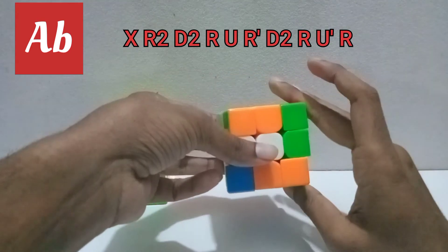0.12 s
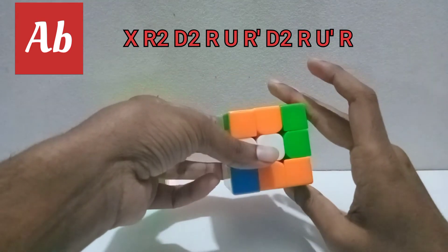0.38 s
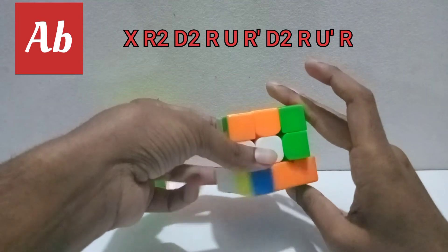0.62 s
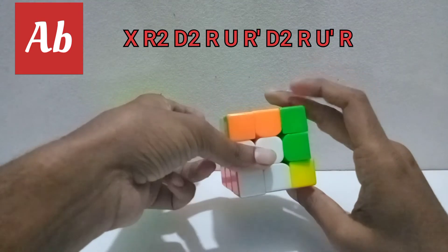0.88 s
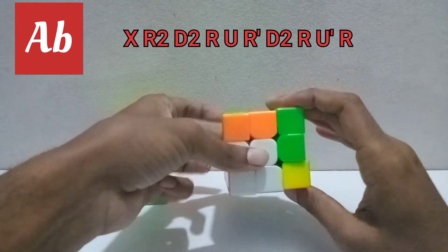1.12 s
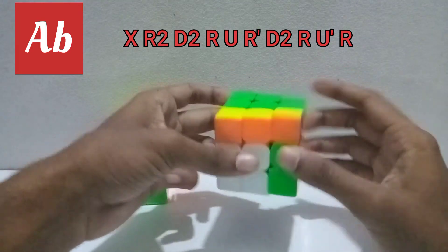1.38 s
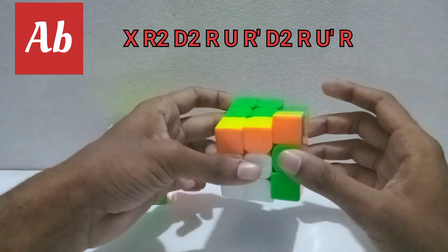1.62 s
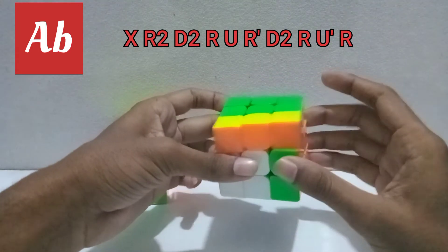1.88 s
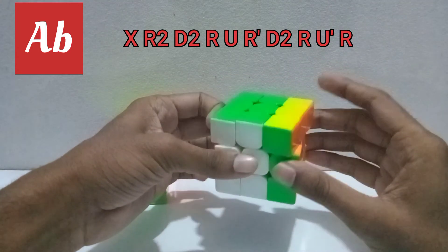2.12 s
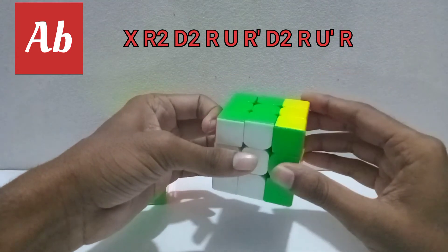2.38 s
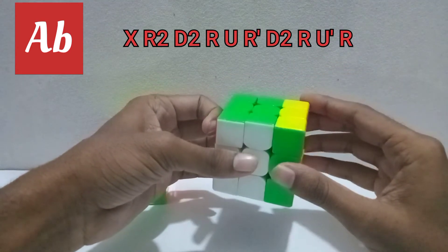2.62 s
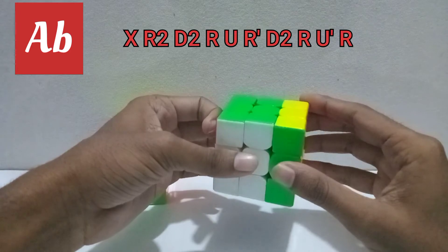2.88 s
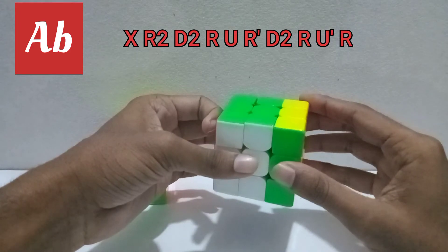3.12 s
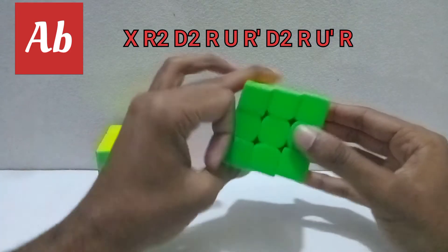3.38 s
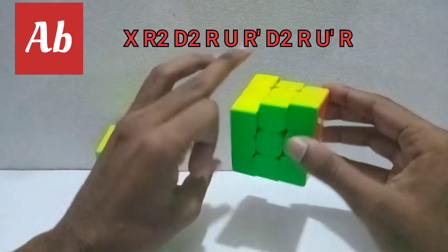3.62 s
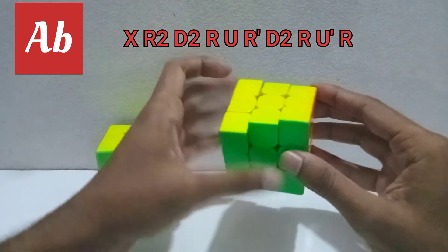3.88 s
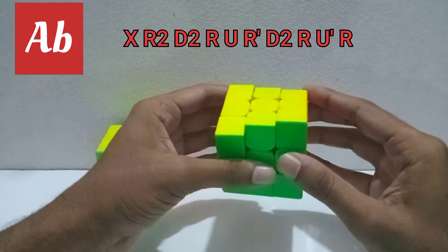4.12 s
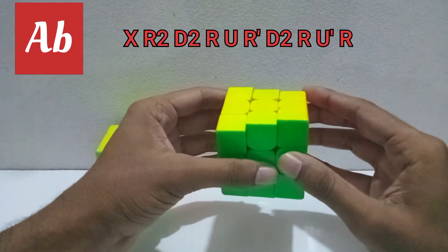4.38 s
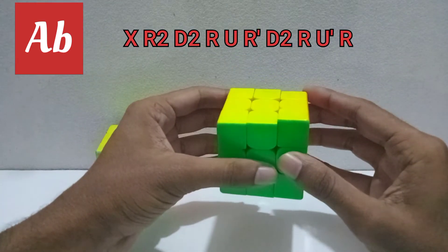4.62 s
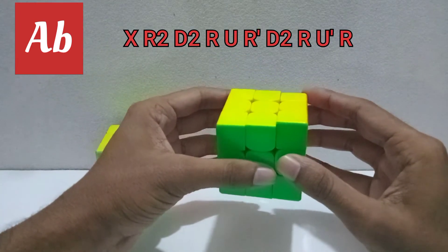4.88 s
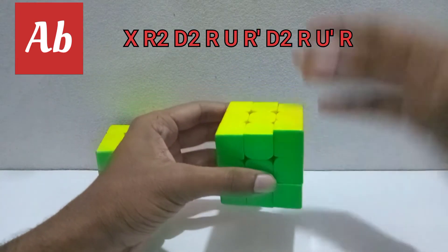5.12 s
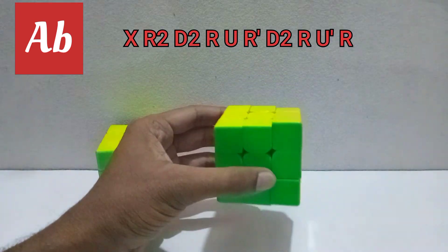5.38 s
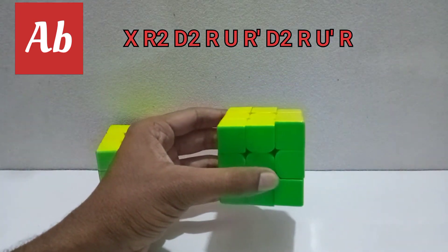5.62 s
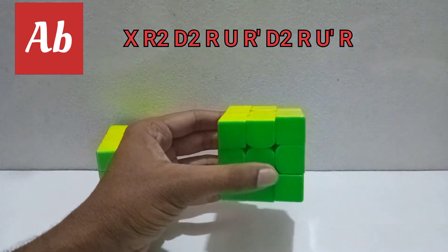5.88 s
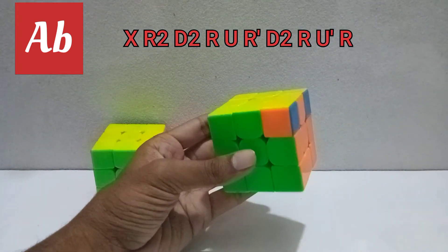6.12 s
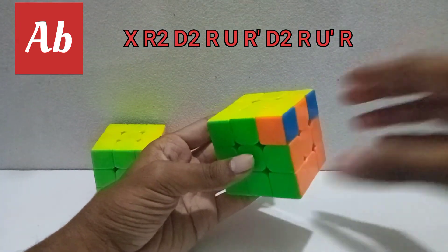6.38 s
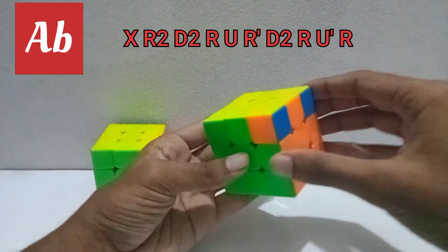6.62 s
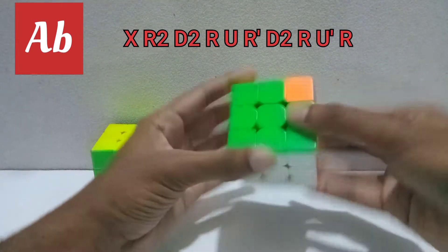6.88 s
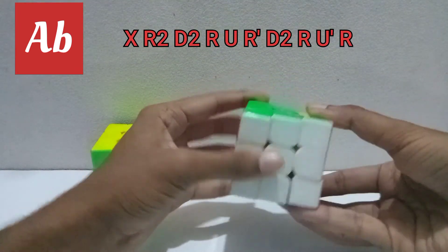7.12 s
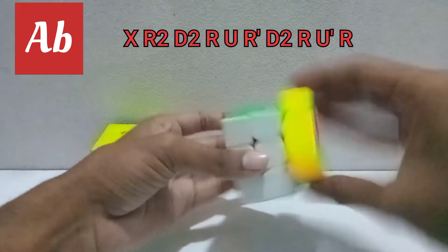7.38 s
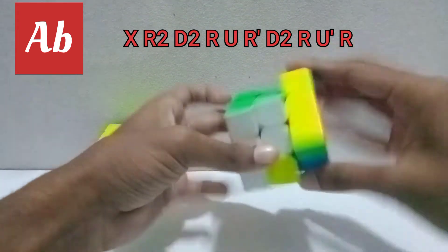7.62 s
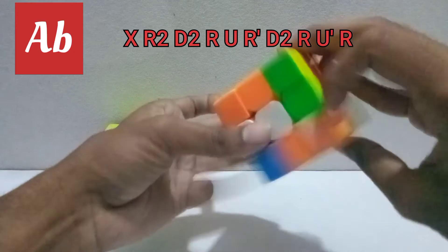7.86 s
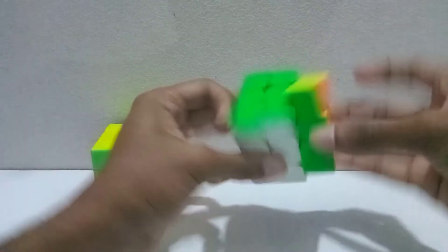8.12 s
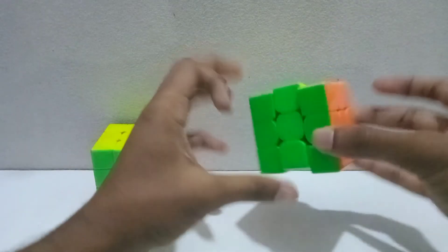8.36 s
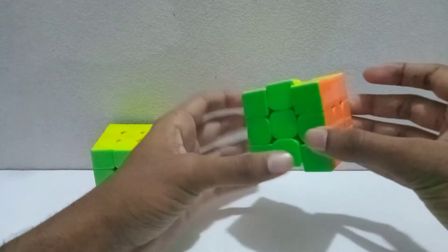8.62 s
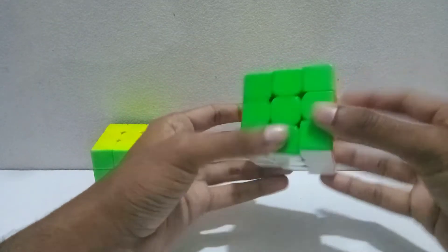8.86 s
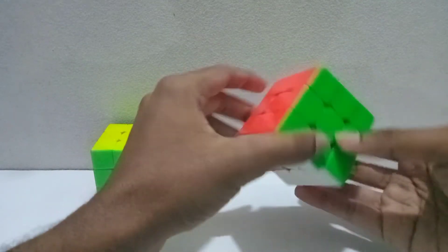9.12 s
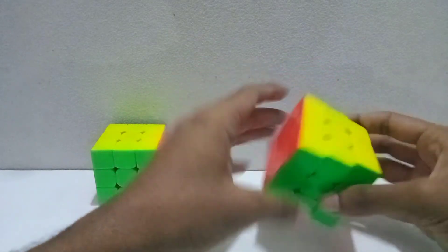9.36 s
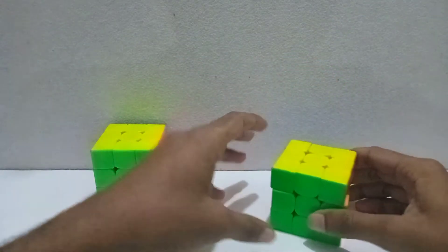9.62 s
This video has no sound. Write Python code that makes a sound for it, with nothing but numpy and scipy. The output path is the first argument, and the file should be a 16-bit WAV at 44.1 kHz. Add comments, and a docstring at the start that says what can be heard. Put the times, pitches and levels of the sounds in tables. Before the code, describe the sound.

Small hollow plastic clicks and short scrapes of sliding layers, heard close and dry indoors, with gaps of soft room noise and a far, blurred clock tick. A firmer rub and bump come at the middle, followed by a tiny total dropout. Later a dense crackling run of quick turns is by far the busiest part; faint finger rustle follows, then the cube lands with a woody knock.

```python
"""Quiet room, phone microphone close to a plastic puzzle cube being turned in the hands over a table.
From the start: coloured noise and two wavering hums for the room, shaped hiss for sliding layers, and short
chatters of contacts ringing the cube's modes. A wall clock ticks far off as swelling noise; from 1.3 s smooth
pushes ring the table top. Just past the middle, at 5.9 s, all sound drops out for a tenth of a second.
The turning is loudest from 7.5 to 8.3 s, then calms; at 9.6 s the cube is set down with a knock."""
import sys
import numpy as np
from scipy import signal
from scipy.fft import rfft, irfft
from scipy.io import wavfile
from scipy.ndimage import uniform_filter1d

SR = 44100
rng = np.random.default_rng(int(sys.argv[2]) if len(sys.argv) > 2 else 0)


def dump(signal):
    """Clip the signal to [-1, 1] and save it as 16-bit WAV at the path in sys.argv[1]."""
    limited = np.clip(np.atleast_2d(signal).T, -1, 1)
    pcm = np.round(limited * 32767).astype(np.int16)
    wavfile.write(sys.argv[1], SR, pcm)


def makeup_ratio(level_db):
    """Linear amplitude ratio for a level in decibels (20 dB per factor of ten)."""
    decades = np.asarray(level_db, float) / 20
    return 10 ** decades


N = 429534
T = np.arange(N) / SR

# Spectrum of the room noise: pitch_hz [Hz], density_db [dB per Hz, relative]
ROOM_NOISE_COLOUR = [(25, -27), (65, -12.5), (86, -9.5), (109, -2), (270, -13), (450, -15.5), (800, -22),
                     (1300, -22.5), (2500, -23), (3600, -29), (4800, -40), (6500, -51), (8500, -52),
                     (15000, -58.5)]
# Low hums of the room: pitch_hz [Hz], width_hz [Hz, band of the noise that makes it waver],
# early_db [dB rms], late_db [dB rms, from the start of the drop-out on]
HUMS = [(102.34, 4.1, -77.5, -67.5), (125.7, 6, -79.5, -77)]
# Layers sliding, fingers brushing, and some soft swells that go with the clock ticks:
# peak_s [s], level_db [dB rms of the middle band, before the rattle],
# rise_s, fall_s [s per 20 dB of level], treble_db [dB over level_db]
SWELLS = [(0.0, -68, .02, .13, 4), (.505, -72.5, 0.054, .1, -5), (.66, -71.5, .03, .2, 0),
          (.804, -58, 0.15, .08, 1), (.95, -72.5, 0.12, .4, -20), (1.151, -72, 0.12, .1, -10),
          (1.239, -69, 0.064, .15, -3.5), (1.345, -63, 0.083, .3, -3), (1.455, -61.5, 0.18, .05, -3),
          (1.6, -76, .1, .4, -20), (1.841, -71.5, 0.063, .3, -4.5), (2.071, -57.5, 0.094, .14, -0.5),
          (2.279, -68, 0.046, .15, -2), (2.355, -65, 0.2, .13, -16), (3.257, -59, 0.024, .02, 3),
          (3.306, -68, .07, .2, 2), (3.388, -59.5, 0.19, .11, -3), (3.536, -58, 0.064, .09, -20),
          (3.65, -69, 0.23, .3, -11), (3.821, -67, 0.054, .1, -8), (4.04, -75, 0.23, .2, -7),
          (4.518, -71.5, .2, .09, -4), (5.066, -59.5, 0.03, .1, -11), (5.116, -53.5, 0.088, .2, -4.5),
          (5.218, -49.5, 0.13, .08, -13), (5.376, -61, 0.16, .09, -20), (5.61, -70, 0.3, .25, -11),
          (6.066, -75, 0.081, .18, -13), (6.613, -65.5, 0.077, .12, -10), (6.8, -75.5, 0.16, .15, -0.5),
          (6.97, -62, 0.032, .07, -7), (7.085, -54.5, 0.017, .2, -5), (7.3, -70, .3, .3, -7),
          (7.429, -55.5, 0.063, .3, -2.5), (7.525, -41, 0.066, .07, 2.5), (7.585, -24, 0.0079, .05, -6),
          (7.68, -44.5, 0.25, .25, 0.5), (7.865, -35.5, 0.092, .25, -0.5), (8.018, -24.5, 0.04, .04, -5.5),
          (8.07, -42, .03, .17, 3.5), (8.253, -23.5, 0.039, .045, 0), (8.347, -48, .04, .11, -7),
          (8.479, -57, 0.23, .06, -15), (8.6, -72, .1, .6, -11), (8.89, -67, .05, .04, -4),
          (8.948, -69.5, .02, .25, -5.5), (9.08, -68, .15, .3, -12), (9.281, -66, 0.18, .2, -7.5),
          (9.466, -61.5, 0.16, .9, -14)]
# Low rustle of the hands: time_s [s], level_db [dB rms before the rattle]
LOW_RUSTLE = [(0, -65.5), (.3, -76), (.4, -68.5), (.65, -80.5), (.85, -61), (1.1, -68), (1.46, -68),
              (1.9, -73), (2.35, -66), (2.7, -79), (3.15, -75), (3.5, -61.5), (4.15, -73.5), (4.43, -67),
              (4.98, -85), (5.154, -40.5), (5.31, -64), (6.3, -79.5), (6.6, -66.5), (6.9, -80), (7.0, -62),
              (7.36, -65.5), (7.5, -55.5), (7.87, -50), (8.3, -65), (8.95, -74), (9.28, -65.5),
              (9.57, -61.5)]
# Spectrum of the hiss of rubbing: pitch_hz [Hz], density_db [dB per Hz, relative]
RUB_COLOUR = [(88, -37), (150, -0.5), (601, -7.5), (883, -8), (1050, -14.5), (1400, -5.5), (1600, -3),
              (2020, -1), (3670, -1.5), (4050, -2), (6550, -22), (8410, -6.5), (10400, -21), (13900, -15),
              (15000, -38.5)]
# Clearer clicks, piece on piece and the cube touching the table:
# peak_s [s], level_db [dB, loudest 1.5 ms rms of 900-12000 Hz],
# pitch_hz [Hz, favoured ring], length_ms [ms, scales the chatter], treble_db [dB, gain of rings from 7 kHz up]
CLICKS = [(0.011, -49.5, 2050, 1.7, -17), (0.032, -53, 850, 7.2, -5), (0.066, -50.5, 1420, 7, -3),
          (0.078, -48.5, 1200, 7.7, -5), (0.726, -59.5, 1460, 3, -21), (0.828, -52.5, 830, 6, -17),
          (0.779, -52.5, 2020, 16, -14), (0.857, -44.5, 5140, 5.6, -7), (1.321, -49, 1740, 5.1, 0),
          (1.34, -41.5, 4200, 1.7, -28), (1.36, -46.5, 2070, 14, -24.5), (1.373, -42.5, 2240, 8.7, -11),
          (1.607, -62, 3180, 3.6, -39), (2.068, -52.5, 1356, 5.3, -3), (2.155, -49, 1514, 1, -8),
          (2.264, -49.5, 1760, 8.7, -24), (2.299, -47.5, 2110, 3.3, -14), (2.311, -41.5, 4300, 5.3, -14),
          (3.259, -48.5, 1340, 11, -11.5), (3.271, -48, 2020, 6.2, -18), (3.317, -52.5, 2040, 25, -5),
          (3.439, -50.5, 910, 2.5, -36), (3.498, -50.5, 3850, 5.8, -24), (3.518, -42, 5500, 7.3, -8),
          (3.539, -41, 760, 3.6, -15), (3.544, -40, 4770, 5.9, -12), (3.568, -51, 757, 4.1, -20),
          (3.813, -57, 1800, 7.4, 2), (4.044, -55.5, 1400, 4.9, -9), (5.057, -50, 2060, 5.9, -2),
          (5.07, -50.5, 2350, 6.6, -19), (5.08, -53.5, 2350, 8.5, -24), (5.106, -41.5, 2450, 10, -26),
          (5.117, -40, 3060, 13, -27), (5.139, -33, 2800, 3.1, -46), (5.156, -49.5, 2280, 15, -15),
          (5.197, -39.5, 1850, 5.9, -48), (5.278, -41.5, 3880, 3.2, 9), (6.225, -52, 1400, 7.3, -26),
          (6.601, -50.5, 1333, 2.6, -7), (6.906, -60, 1440, 13, -32), (6.962, -50.5, 910, 8.4, -12),
          (6.967, -42, 2220, 8.1, 0), (6.98, -49, 2110, 8, -23), (7.009, -48, 1420, 6.4, -42),
          (7.08, -29, 1390, 4.1, 0.5), (7.115, -45, 4200, 4, -21.5), (7.21, -51, 1491, 3.2, -34),
          (7.244, -55.5, 1450, 9, -14), (7.414, -51.5, 1366, 3.9, -25), (7.477, -45, 2190, 10.4, -12.5),
          (7.512, -39, 4110, 6, -5), (7.526, -27.5, 1400, 6.5, -22.5), (7.538, -37, 2170, 6.2, -9.5),
          (7.571, -30, 2057, 16, -2), (7.582, -27, 3120, 15.3, 3), (7.593, -14, 1380, 3.1, 2.5),
          (7.622, -22.5, 2240, 3.9, -0.5), (7.629, -21.5, 4650, 9.4, -6), (7.669, -26, 1790, 9.5, -4),
          (7.709, -22.5, 1536, 7.2, -5.5), (7.741, -33, 3470, 8, -21.5), (7.756, -33, 3846, 5.8, -7),
          (7.78, -30.5, 2090, 5.7, -20.5), (7.803, -29.5, 2050, 9.2, -19.5), (7.816, -29.5, 4865, 13, -12),
          (7.844, -35.5, 1468, 13, -8), (7.858, -24.5, 1966, 6, -12.5), (7.881, -20.5, 4310, 6.1, -2),
          (7.89, -30.5, 4955, 19, -7.5), (7.913, -24.5, 2050, 1.1, -14), (7.925, -24.5, 1380, 7.1, -8.5),
          (7.941, -24.5, 2060, 8.8, -4.5), (7.993, -34.5, 1437, 12, 0.5), (8.004, -12.5, 1340, 7, 7.5),
          (8.023, -24, 3960, 9.8, -17), (8.032, -25.5, 3980, 10, -0.5), (8.104, -19, 4390, 6.4, -10),
          (8.144, -33.5, 2000, 19, -13), (8.179, -37.5, 2097, 20.7, -1), (8.238, -20, 2034, 7.5, 3),
          (8.25, -14.5, 4030, 5.9, -3.5), (8.27, -38, 2300, 16, 1.5), (8.301, -29, 1600, 11.3, 0),
          (8.88, -50, 3490, 4.3, -40), (9.055, -58.5, 1400, 3, -24.5), (9.308, -59, 3140, 3.2, -20),
          (9.085, -55.5, 940, 2.2, -37), (9.159, -57, 2070, 3.6, -17), (9.211, -59.5, 3900, 5.1, -21),
          (9.248, -60, 2170, 6.5, -10), (9.43, -55.5, 2960, 5, 1), (9.169, -56, 1830, 3.4, -22),
          (9.269, -53, 1490, 5.3, -45), (9.515, -50, 3450, 1.8, -24), (9.606, -12.5, 980, 6, -9.5),
          (9.678, -35, 2650, 7.2, -21)]
# Rings of the cube, damped by the fingers: pitch_hz [Hz, before detuning], level_db [dB], t60_s [s]
CUBE_MODES = [(125, 5.5, .02), (233, 5.5, 0.014), (420, -5.5, 0.01), (740, -11.5, .016), (920, -13.5, .014),
              (1400, -6.5, 0.032), (2096, -2.5, 0.013), (1820, -24.5, 0.021), (2450, -4.5, 0.015),
              (3240, -1, 0.011), (3840, -4, 0.019), (4370, -4, 0.013), (5070, 8.5, 0.0029),
              (5600, -2.5, 0.0037), (6900, -1.5, 0.0035), (8200, 7.5, 0.009), (9200, -2, 0.015),
              (11700, -10.5, .003), (11800, -9, 0.0032), (14100, -13.5, .003)]
# Diffuse tail of the room by band: centre_hz [Hz], t60_s [s], energy_db [dB re the sound sent into it]
ROOM_TAIL = [(158, 0.4, -30), (365, 0.88, -27), (1500, 0.33, -17.5), (3870, 0.31, -18.5), (9900, 0.22, -17)]
# Ticks of the far clock: start_s [s], level_db [dB rms, before the swell and the decay]
CLOCK_TICKS = [(0.331, -49), (1.335, -48.5), (2.33, -50.5), (3.33, -48.5), (4.33, -48), (5.329, -48.5),
               (6.428, -50.5), (7.43, -44), (8.445, -49.5), (9.439, -49.5)]
# Spectrum of a clock tick: pitch_hz [Hz], density_db [dB per Hz, relative]
TICK_COLOUR = [(240, -42.5), (400, -6.5), (425, -9), (572, -8.5), (1330, -8), (1570, -1.5), (2120, -4),
               (2280, -2), (3410, -11.5), (14000, -48)]
# Blows on the table top: time_s [s], peak_db [dB], contact_ms [ms], bright_db [dB per octave over the 2nd mode]
THUDS = [(1.326, -30.5, 8.8, -3), (1.612, -41.5, 1.5, -3.5), (5.138, -37.5, 1.7, 17),
         (5.19, -37, 3.6, -0.5), (7.586, -39, 3.1, 0.9), (7.63, -41.5, 2.8, -5.5), (8.003, -26, 2.5, 1.5),
         (8.247, -45, 2.2, -3.5), (9.607, -1.5, 1.51, 1)]
# Rings of the table top: pitch_hz [Hz], level_db [dB], t60_s [s]
TABLE_MODES = [(105, -24, .2), (147, -1, 0.42), (127, -16, 0.17), (177, -10.5, 0.22), (208, 2, 0.11),
               (267, 4, 0.13), (293, -1.5, 0.087), (331.7, -5.5, 0.1), (233, -5.5, 0.17), (390, -5.5, 0.24),
               (420, -8, 0.18), (560, -14.5, .12), (699, -19, 0.15), (944, 9.5, .08), (1040, -0.5, .1),
               (1210, -3.5, 0.076), (1404, -1, .06)]

ROOM_NOISE_DB = -68  # rms, before its low octaves swell
WANDER_DB, WANDER_PER_S = 3.5, 11  # random swells before smoothing, and their pace
REST_DB, REST_TREBLE_DB = -83, -105  # rubbing of hands at rest
TREBLE_STEEPER = 1.3  # the treble of a swell comes and goes faster
# Small ticks while anything slides: level and treble relative to the rubbing; none below STILL_DB
SMALL_PER_S, SMALL_DB, SMALL_SCATTER_DB, SMALL_TREBLE_DB = 34, 2.5, 2, -9.5
SMALL_MS, SMALL_LOW_HZ, SMALL_HIGH_HZ, STILL_DB = 4.5, 1300, 4500, -74
# Bass of a click: dB at level -36.5 dB and flat treble, change per dB of level and of treble,
# and extra dB within TOUCH_S of a thud louder than FIRM_THUD_DB
CLICK_BASS_DB, BASS_PER_LEVEL, BASS_PER_TREBLE, TOUCH_DB = -18, -.3, -0.17, 16.5
FIRM_THUD_DB, TOUCH_S = -37, .012
EDGE_HZ = 735  # the small pieces send out little below this
TICK_ONSET = 0.15  # share of a clock tick there at once
TICK_EDGE_DB, TICK_EDGE_T60_S = -24.5, 0.31  # its brighter edge, re the tick
DROPOUT_START_S, DROPOUT_END_S = 5.8825, 5.9825


def level(x, db):
    """Scale to an rms level."""
    return x * makeup_ratio(db) / np.sqrt(np.mean(x ** 2))


def colour(x, points):
    """Shape a spectrum by (Hz, dB) points, joined along log frequency."""
    hz, db = np.transpose(points)
    f = np.maximum(np.arange(len(x) // 2 + 1) * SR / len(x), 1)
    return irfft(rfft(x) * makeup_ratio(np.interp(np.log(f), np.log(hz), db)), len(x))


def band(x, lo_hz, hi_hz):
    """Butterworth band-pass."""
    return signal.sosfilt(signal.butter(2, [lo_hz, hi_hz], "bandpass", fs=SR, output="sos"), x)


def highpass(x, order, hz):
    """Butterworth high-pass."""
    return signal.sosfilt(signal.butter(order, hz, "high", fs=SR, output="sos"), x)


def ring(modes, gain_db, detune, size):
    """Free ringing of a struck body: a sum of dying sines."""
    hz, db, t60 = np.transpose(modes)[:, :, None]
    t = np.arange(size) / SR
    envelope = makeup_ratio(db + gain_db[:, None] - 60 * t / t60)
    return np.sum(envelope * np.sin(2 * np.pi * hz * detune[:, None] * t), axis=0)


def add(out, s, sound):
    """Mix a sound in at a time, trimmed to the scene."""
    i = int(s * SR)
    sound, i = sound[max(-i, 0):], max(i, 0)
    out[i:i + len(sound)] += sound[:N - i]


def wandering(x):
    """Each octave of the low room noise swells and sinks on its own."""
    hold, out = int(SR / WANDER_PER_S), x
    for lo_hz in (100, 200, 400):
        steps = np.repeat(rng.standard_normal(N // 1000), hold)[:N]
        walk = uniform_filter1d(uniform_filter1d(steps, hold), hold)
        out = out + band(x, lo_hz, 2 * lo_hz) * (makeup_ratio(WANDER_DB * walk) - 1)
    return out


def air():
    """Room noise with two low hums, steady in level, whose phase follows narrow noise and so wavers."""
    after, hum = T > DROPOUT_START_S, 0
    for hz, width_hz, early_db, late_db in HUMS:
        noise = rng.standard_normal(N) + 1j * rng.standard_normal(N)
        drift = signal.sosfilt(signal.butter(2, width_hz / 2, fs=SR, output="sos"), noise)
        tone = np.real(drift / np.abs(drift) * np.exp(2j * np.pi * hz * T))
        hum = hum + level(tone, 0) * makeup_ratio(np.where(after, late_db, early_db))
    noise = level(colour(rng.standard_normal(N), ROOM_NOISE_COLOUR), ROOM_NOISE_DB)
    return wandering(noise) + hum


def swelling():
    """Level in dB of the rubbing hiss and of its treble: every swell rises to its peak and fades; powers add."""
    mid, top = np.full(N, makeup_ratio(2 * REST_DB)), np.full(N, makeup_ratio(2 * REST_TREBLE_DB))
    for s, db, rise_s, fall_s, treble_db in SWELLS:
        span = slice(max(int((s - 4 * rise_s) * SR), 0), int((s + 4 * fall_s) * SR))
        down_db = 20 * np.maximum((s - T[span]) / rise_s, (T[span] - s) / fall_s)
        mid[span] += makeup_ratio(2 * (db - down_db))
        top[span] += makeup_ratio(2 * (db + treble_db - TREBLE_STEEPER * down_db))
    return 10 * np.log10(mid), 10 * np.log10(top)


def rattle(per_s):
    """Random bumps of uneven size, each about 3 ms long."""
    bumps = (rng.random(N) < per_s / SR) * rng.exponential(size=N)
    return signal.fftconvolve(bumps, np.hanning(150), "same")


def rubbing(mid_db, top_db):
    """Plastic rubbing, hands rustling and the soft swells: a hiss broken into rattles, more so when louder."""
    out, shared = 0, rattle(110)
    effort = np.clip((mid_db + 70) / 25, .25, 1.2)
    rub = colour(rng.standard_normal(N), RUB_COLOUR)
    rustle_db = np.interp(T, *np.transpose(LOW_RUSTLE))
    for lo_hz, hi_hz, db in [(845, 6000, mid_db), (4200, 14200, top_db), (180, 1190, rustle_db)]:
        # every band follows the shared rattle and one of its own
        grain = 1 + effort * (shared + .6 * rattle(300) - .7)
        out = out + level(band(rub, lo_hz, hi_hz), 0) * grain * makeup_ratio(db)
    return out


def small_ticks(mid_db, top_db):
    """Rows like CLICKS at random moments, strength and treble following the hiss; none while it is faint."""
    place, size, pitch, length = rng.random((int(SMALL_PER_S * N / SR), 4)).T
    s = (np.arange(len(place)) + place) / SMALL_PER_S
    i = (s * SR).astype(int)
    db = mid_db[i] + SMALL_DB + SMALL_SCATTER_DB * (2 * size - 1)
    ring_hz = SMALL_LOW_HZ * (SMALL_HIGH_HZ / SMALL_LOW_HZ) ** pitch
    treble_db = top_db[i] - mid_db[i] + SMALL_TREBLE_DB
    rows = np.array([s, db, ring_hz, SMALL_MS * (.5 + length), treble_db]).T
    return list(rows[mid_db[i] > STILL_DB])


def clicks(rows):
    """Each click is a chatter of contacts a few ms long that rings the cube from another spot, favouring one ring.
    Returns the sound towards the microphone and the evener sound sent all round the room."""
    near, around = np.zeros(N), np.zeros(N)
    hz = np.array(CUBE_MODES)[:, 0]
    t_ms = np.arange(-440, 880) / SR * 1000
    firm = np.array([s for s, db, *_ in THUDS if db > FIRM_THUD_DB])
    for s, db, ring_hz, ms, treble_db in rows:
        touching = np.abs(firm - s).min() < TOUCH_S
        bass_db = CLICK_BASS_DB + BASS_PER_LEVEL * (db + 36.5) + BASS_PER_TREBLE * treble_db
        bass_db = bass_db + TOUCH_DB * touching
        tilt_db = np.interp(np.log(hz), np.log([480, 760, 4200, 7000]), [bass_db, 0, 0, treble_db])
        # another spot of the cube: other strengths, slightly other pitches
        chance = rng.standard_normal((2, len(CUBE_MODES)))
        spot_db = tilt_db + 1.5 * chance[0]
        detune = 1 + 0.05 * chance[1]
        # the favoured ring and a very short one join the upper modes
        modes = CUBE_MODES[3:] + [(ring_hz, 7, .009), (2800, 9, .0012)]
        pieces = ring(modes, np.append(spot_db[3:], [0, 0]), np.append(detune[3:], [1, 1]), size=1400)
        low_rings = ring(CUBE_MODES[:3], spot_db[:3], detune[:3], size=1400)
        body = highpass(pieces, 3, EDGE_HZ) + low_rings
        # contacts build up fast and thin out slowly
        envelope = np.exp(np.where(t_ms < 0, t_ms / min(0.19 * ms, 1.1), -t_ms / (0.46 * ms)))
        chatter = rng.standard_normal(len(t_ms)) * envelope
        # the main contact carries a good part of the energy
        chatter[440] += .65 * np.linalg.norm(chatter)
        sound = signal.fftconvolve(body, chatter)
        loudest = uniform_filter1d(band(sound, 900, 12000) ** 2, size=66).max()
        sound *= makeup_ratio(db) / np.sqrt(loudest)
        add(near, s + (t_ms[0] - .7) / 1000, sound)
        # heard from all sides at once the rings blur together
        even = ring(CUBE_MODES, tilt_db, np.ones(len(CUBE_MODES)), size=1400)
        even = even * makeup_ratio(-60 * np.arange(1400) / SR / .006)
        even = highpass(even, 3, EDGE_HZ)
        add(around, s, even * np.linalg.norm(sound) / np.linalg.norm(even))
    return near, around


def room(x):
    """Diffuse tail: bands of noise, each dying at its own rate."""
    t, tail = np.arange(SR // 2) / SR, 0
    for hz, t60, db in ROOM_TAIL:
        noise = level(band(rng.standard_normal(len(t)), hz / 1.64, min(hz * 2.2, 16000)), 0)
        # the root brings the decaying noise to unit energy
        tail = tail + makeup_ratio(db - 60 * t / t60) * noise * np.sqrt(14 / t60 / SR)
    return signal.fftconvolve(x, tail * (1 - np.exp(-t / 0.00043)))[:N]


def clock():
    """Too far for a direct click: a soft bright edge, a swell of reflections, then it dies with the room."""
    out, t = np.zeros(N), np.arange(SR // 3) / SR
    swell = 1 - (1 - TICK_ONSET) * np.exp(-t / 0.034)
    for s, db in CLOCK_TICKS:
        wash = level(colour(rng.standard_normal(len(t)), TICK_COLOUR), db)
        edge = level(band(rng.standard_normal(len(t)), 1800, 8000), db + TICK_EDGE_DB)
        add(out, s, wash * swell * makeup_ratio(-60 * t / 0.39) + edge * makeup_ratio(-60 * t / TICK_EDGE_T60_S))
    return out


def thuds():
    """A smooth push rings the table top; each blow has its own length and brightness."""
    out = np.zeros(N)
    octaves = np.log2(np.array(TABLE_MODES)[:, 0] / TABLE_MODES[1][0])
    for s, db, contact_ms, bright_db in THUDS:
        push = np.hanning(max(int(contact_ms * SR / 1000), 4))
        rings = ring(TABLE_MODES, bright_db * octaves, np.ones(len(TABLE_MODES)), size=12000)
        sound = signal.fftconvolve(rings, push)
        add(out, s - .0025, sound * makeup_ratio(db) / np.abs(sound).max())
    return out


def scene():
    """All sources at one microphone, which passes little deep bass; the far clock and the room noise come in
    after that cut."""
    mid_db, top_db = swelling()
    near, around = clicks(CLICKS + small_ticks(mid_db, top_db))
    rub, knocks = rubbing(mid_db, top_db), thuds()
    close = near + rub + knocks + room(around + rub + knocks)
    mono = highpass(close, 4, 108) + clock() + air()
    return np.array([mono, mono])


def low_pass(x):
    """Removes everything above the highest recorded frequency."""
    return signal.sosfilt(signal.butter(12, 15640, fs=SR, output="sos"), x)


def record(dry):
    """The treble differs a little between the channels; the top is cut; the sound drops out once."""
    smear = rng.standard_normal(900) * np.exp(-np.arange(900) / 150)
    smeared = signal.fftconvolve(dry[0], smear / np.linalg.norm(smear))[:N]
    side = highpass(smeared, 12, 5400)
    stereo = dry + makeup_ratio(-10.5) * side * np.array([[1], [-1]])
    stereo = signal.sosfilt(signal.ellip(8, .3, 60, 14400, fs=SR, output="sos"), stereo)
    stereo = stereo * ((T < DROPOUT_START_S) | (T > DROPOUT_END_S))
    mix = np.clip(stereo, -1, 1)
    return low_pass(mix)


dry = scene()
out = record(dry)
dump(out)
```